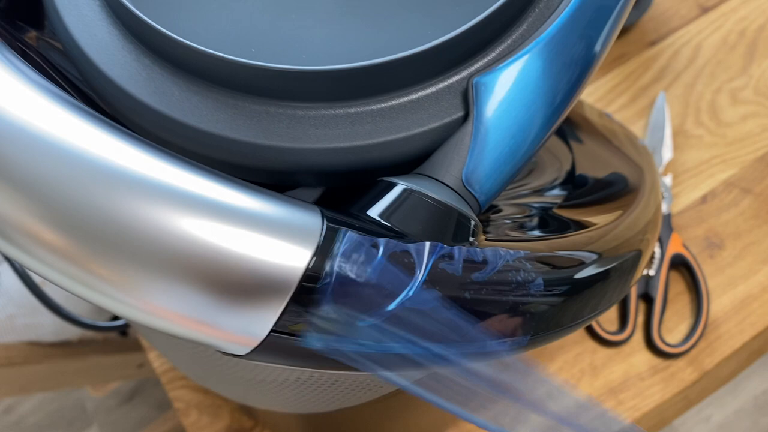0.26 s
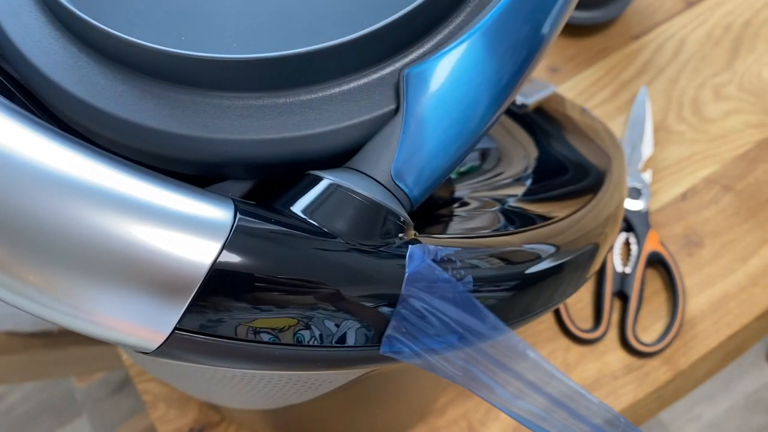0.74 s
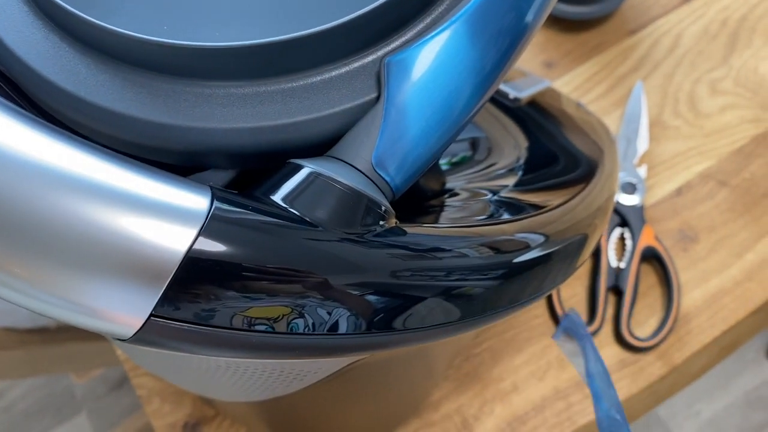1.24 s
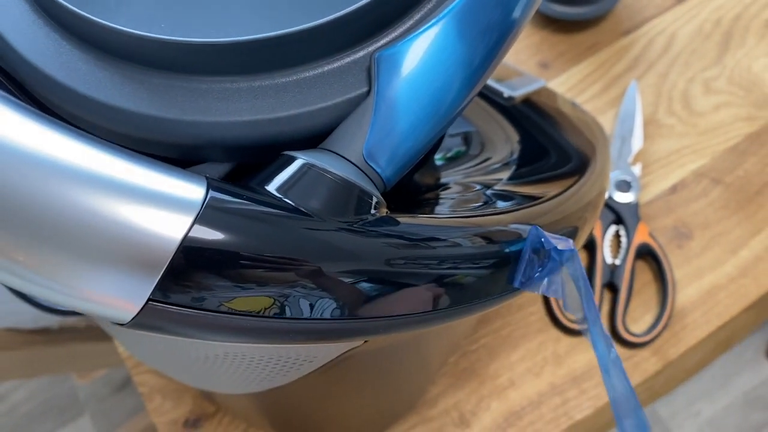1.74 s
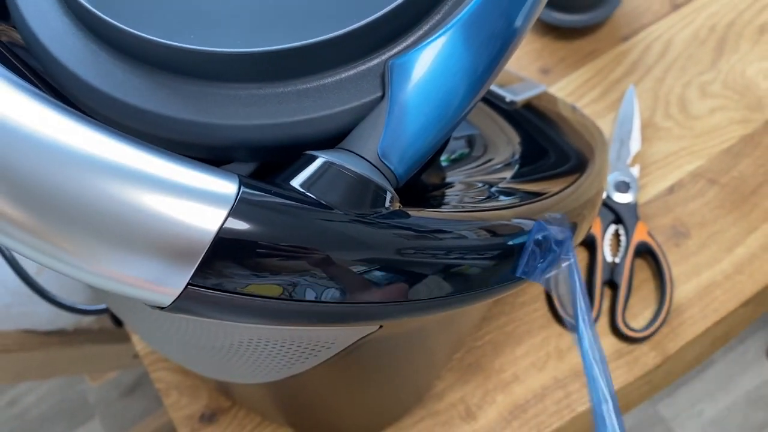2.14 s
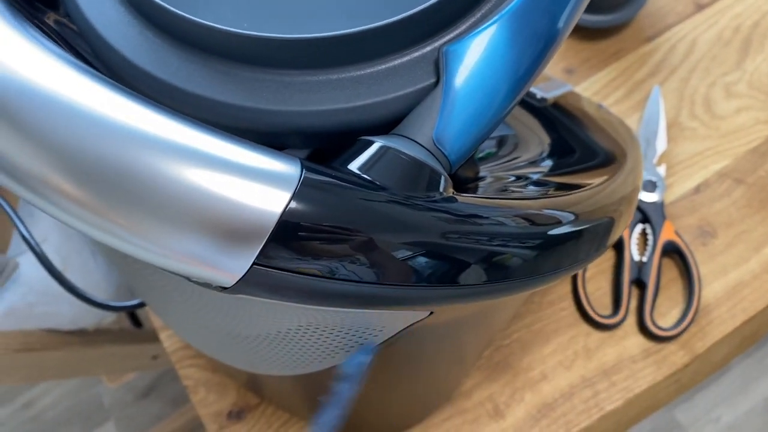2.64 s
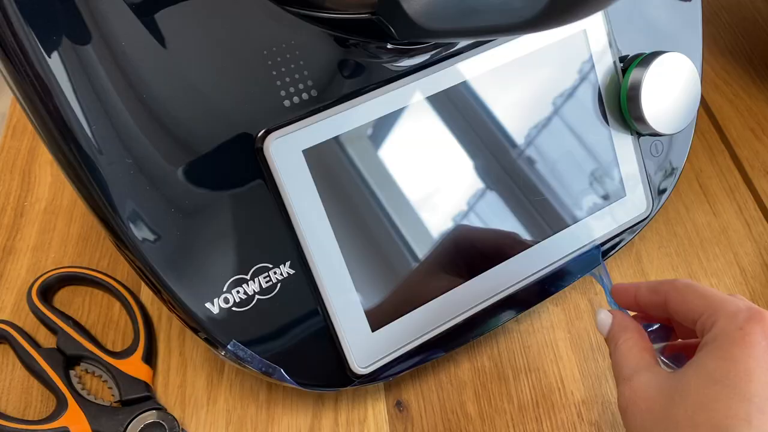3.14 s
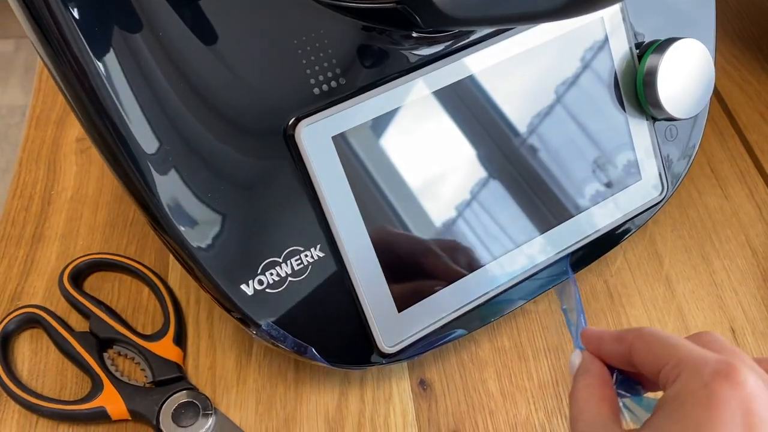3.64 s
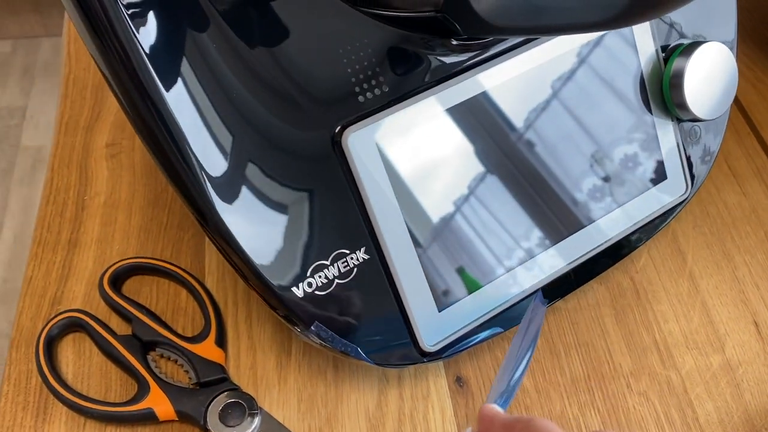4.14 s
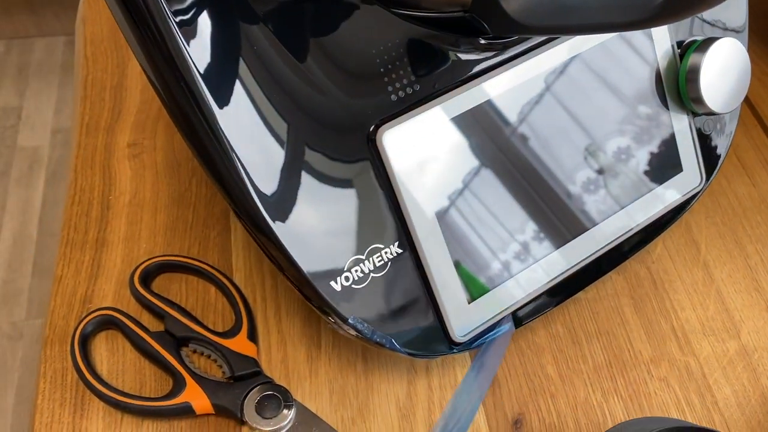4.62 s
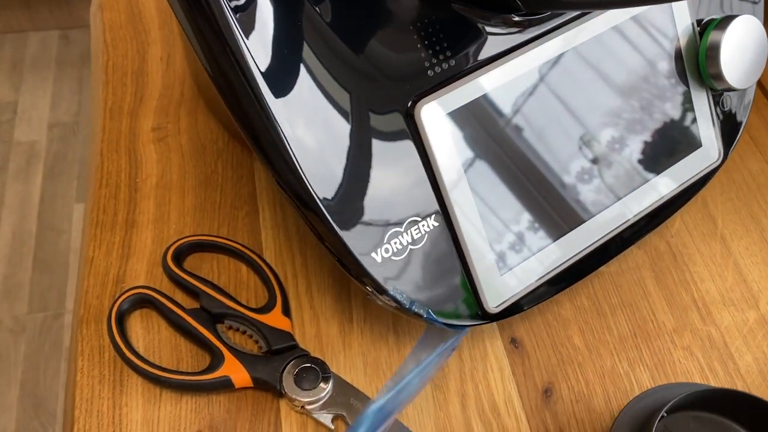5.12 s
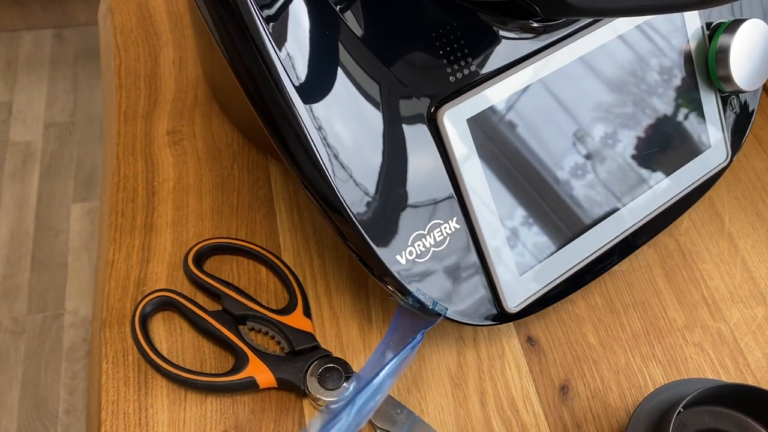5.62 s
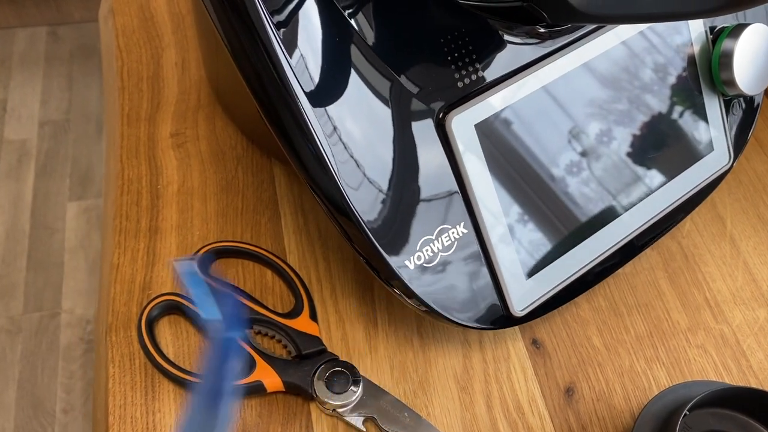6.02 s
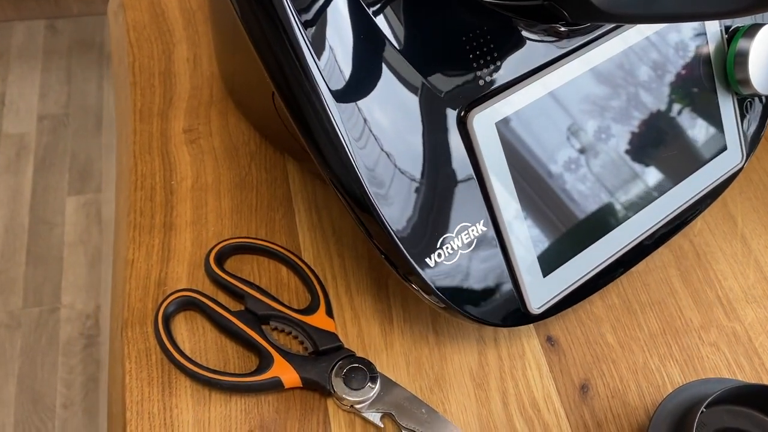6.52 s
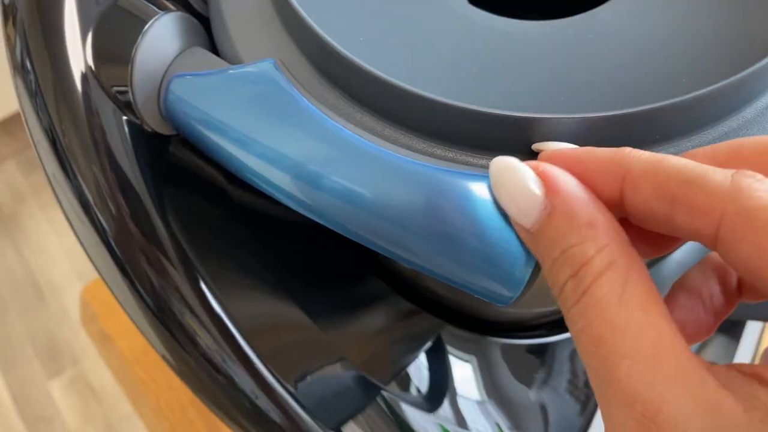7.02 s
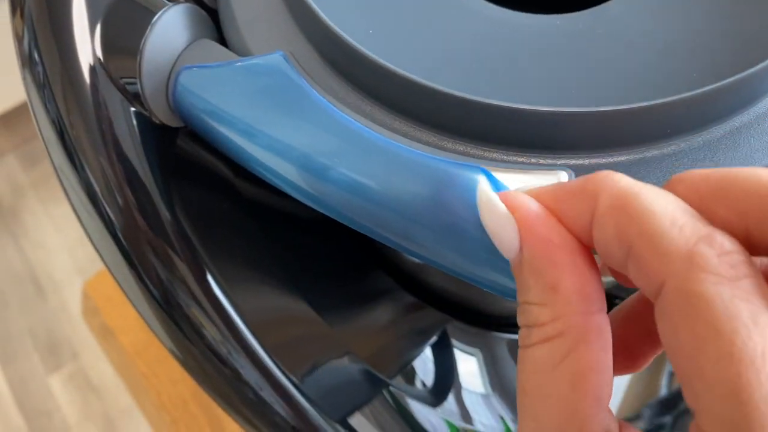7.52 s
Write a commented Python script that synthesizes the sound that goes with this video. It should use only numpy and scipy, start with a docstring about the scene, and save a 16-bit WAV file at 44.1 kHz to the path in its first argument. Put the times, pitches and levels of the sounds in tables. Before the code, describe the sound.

Very close in a small room, clingy protective film is pulled from a hollow kitchen appliance. Sharp bright snaps and crackle burst out, thin to scattered ticks, then return as a longer, denser rip with boomy knocks from the shell. It breaks into smaller bursts and ends abruptly, leaving faint room tone and barely audible fingertip rubbing. The close stereo treble shifts between sides.

```python
"""In a small room, thin protective film is peeled off the glossy shell of a kitchen appliance on a wooden
table. The glue lets go in sharp snaps and dense crackle: short noise bursts ring the taut film brightly, knock
the shell and push a boom out of the hollow inside. Jolts add dull thuds; faint room tone lies below. Two
peeling passages are followed by a barely audible one of fingertips rubbing. The scene changes where a passage
ends, cutting off the echoes, and two close microphone ports shift the treble against each other."""
import sys
import numpy as np
from scipy import signal
from scipy.fft import rfft, irfft, next_fast_len
from scipy.io import wavfile
from scipy.ndimage import uniform_filter1d

SR = 44100
rng = np.random.default_rng(int(sys.argv[2]) if len(sys.argv) > 2 else 0)


def master(y):
    """Save y as 16-bit WAV."""
    cut = np.clip(np.atleast_2d(y).T, -1, 1)
    pcm = np.round(cut * 32767)  # scale
    wavfile.write(sys.argv[1], SR, pcm.astype(np.int16))


N = 342216   # samples

PASSAGE_ENDS_S = 3.17, 6.915   # the scene changes here, at the ends of the two peeling passages

# resonances of the taut film: [f/Hz, width/Hz, level/dB]
FILM_MODES = [(6460, 10500, 0), (11200, 5650, 8), (15600, 1400, 6)]
# resonances of the hollow inside of the appliance: [f/Hz, width/Hz, level/dB]
HOLLOW_MODES = [(61, 33, -13), (95, 33, -5.5), (151.5, 30, -1), (223, 32, 2.5), (290, 67, -1.5),
                (417, 88, -1.5)]
# the free strip of film: [t/s, resonance f/Hz, pull on the hollow shell/dB, strength of its ring/dB]
FREE_STRIP = [(0, 7300, 0, -0.5), (1.2, 7600, 2, 3), (1.45, 5500, -12, -1.5), (2.0, 6930, -12.5, 4),
              (2.2, 6700, -1.5, 9.5), (2.45, 6770, -8.5, 4.5), (3.15, 5500, -14.5, 1.5),
              (3.25, 6800, -6, -8), (3.95, 6300, -0.5, 3.5), (4.15, 6100, -3, 12), (4.35, 5200, -3.5, 8.5),
              (4.7, 4770, -6.5, 4), (5.0, 6540, -6.5, -9.5), (5.95, 5300, -8, -1.5), (6.25, 4320, -10, 1.5),
              (6.75, 4600, -17, 4), (6.9, 4500, -4, 4)]


def from_db(db):
    """Gain of a dB value."""
    return 10 ** (np.asarray(db) / 20)


def rms_one(x):
    """Scale to unit rms."""
    return x / np.sqrt(np.mean(x ** 2) + 1e-20)


def resonance(x, hz, width):
    """Two-pole band-pass with gain 1 at its peak; a narrower width rings longer."""
    r = np.exp(-np.pi * width / SR)
    poles = [1, -2 * r * np.cos(2 * np.pi * hz / SR), r * r]
    return signal.lfilter([(1 - r * r) / 2, 0, (r * r - 1) / 2], poles, x + 1e-18)


def body(x, modes):
    """A vibrating object as parallel resonances with alternating signs."""
    out = 0
    for k, (hz, width, db) in enumerate(modes):
        out = out + (-1) ** k * from_db(db) * resonance(x, hz, width)
    return out


def drift(rate):
    """Slow random wander with spread 1 at its knots, rate knots per second."""
    knots = rng.standard_normal(int(N / SR * rate) + 3)
    return np.interp(np.arange(N) / SR * rate, np.arange(len(knots)), knots)


def room_tone():
    """Faint steady noise, shaped in frequency and mostly shared by both sides."""
    # colour of the room tone before its overall level is set: [f/Hz, relative level/dB]
    hush_colour = [(20, -15.5), (45, 0.5), (220, 2), (500, -11.5), (1000, -17.5), (15000, -36.5)]
    level_db = -74.5   # rms
    hz = np.maximum(np.fft.rfftfreq(N, 1 / SR), 1)
    colour_hz, colour_db = np.transpose(hush_colour)
    colour = from_db(np.interp(np.log(hz), np.log(colour_hz), colour_db))
    mid, side = irfft(rfft(rng.standard_normal((2, N))) * colour, N)
    return from_db(level_db) * rms_one(mid + .35 * side * [[1], [-1]])


def room(x):
    """Echo tail: noise dying band by band, partly shared by both sides; it is cut off where the scene changes
    at the end of a passage."""
    # decay of the room by band: [f/Hz, t60/s, left-right likeness 0..1]
    room_bands = [(146, 0.27, 1), (513, 0.49, 0.6), (1500, 0.41, .4), (4000, 0.41, 0.48), (8050, 0.25, 1),
                  (14100, 0.19, .85)]
    hz, t60, alike = np.transpose(room_bands)
    edges = np.r_[40, np.sqrt(hz[1:] * hz[:-1]), .45 * SR]
    t, tail = np.arange(SR // 2) / SR, 0
    for k in range(len(hz)):
        band = signal.butter(2, edges[k:k + 2], "band", fs=SR, output="sos")
        mid, side = signal.sosfilt(band, rng.standard_normal((2, len(t))))
        shared = np.clip(alike[k], 0, 1)
        stereo = np.sqrt(1 + shared) * mid + np.sqrt(1 - shared) * side * [[1], [-1]]
        tail = tail + from_db(-60 * t / t60[k]) * stereo
    tail = tail * (1 - np.exp(-t / 0.0017)) * (1 + 0.5 * np.exp(-t / 0.0061))   # table and shell echo first
    tail = tail / np.sqrt(np.sum(tail ** 2) / 2)
    out = np.zeros((2, N))
    cuts = [0, *[round(s * SR) for s in PASSAGE_ENDS_S], N]
    for a, b in zip(cuts, cuts[1:]):
        out[:, a:b] = signal.fftconvolve(x[None, a:b], tail, axes=1)[:, :b - a]
    return out


def thuds():
    """A jolt shakes the hollow inside and the table: noise through both bodies, dying away."""
    # jolts of the appliance: [t/s, nominal peak level/dB, t60/s]
    jolts = [(0.201, -43, 0.23), (2.156, -32, 0.5), (5.947, -31, 0.1), (6.185, -31, 0.082),
             (6.795, -32.5, 0.26), (6.867, -52, 0.79)]
    table_top = 94, 28, 3.7   # wood under the appliance: f/Hz, width/Hz, level/dB
    peak_to_rms_db = 10.5
    t, shake = np.arange(N) / SR, 0
    for s, peak_db, t60 in jolts:
        fade_db = -60 * np.maximum(t - s, 0) / t60
        shake = shake + (t > s) * from_db(peak_db - peak_to_rms_db + fade_db)
    return shake * rms_one(body(rng.standard_normal(N), [table_top, *HOLLOW_MODES]))


def knocked(x, pull_db):
    """The folds always ring; the shell rings only as hard as the strip pulls on it."""
    # folds of the film: [f/Hz, width/Hz, level/dB]
    crease_modes = [(1919, 736, 2), (2550, 946, 4), (3990, 3980, -8.5)]
    # the shell: [f/Hz, width/Hz, level/dB]
    shell_modes = [(500, 150, -5), (770, 580, 1), (1323, 320, 6)]
    return body(x, crease_modes) - from_db(0.6 * pull_db) * body(x, shell_modes)


def tugging():
    """The hand pulls in tugs: crackle level, shell share and small-snap level along time, all in dB."""
    # tugs: [start t/s, length/s, crackle level/dB, shell share/dB, typical small-snap peak/dB]
    tugs = [(0.0, 0.13, -50, -24, -64), (0.129, 0.099, -40.5, -22, -46), (0.2, 0.031, -31.5, -19.5, -29.5),
            (0.234, 0.069, -25.5, -6.5, -7.5), (0.324, 0.03, -28, -6, -16.5),
            (0.455, 0.055, -27.5, -7.5, -10.5), (0.509, 0.14, -43, -7.5, -21.5),
            (0.666, 0.084, -47.5, -5, -33.5), (1.061, 0.013, -43.5, -7, -21.5),
            (1.069, 0.018, -29, -9, -18.5), (1.096, 0.017, -29.5, -7, -17.5), (1.412, 0.076, -49, 2, -33.5),
            (1.49, 0.075, -44, 5.5, -27.5), (1.562, 0.045, -50, 2, -32.5), (1.702, 0.2, -50.5, 0, -45.5),
            (2.131, 0.023, -42.5, 2, -37.5), (2.155, 0.085, -29, -12.5, -18.5),
            (2.234, 0.034, -22, -18, -4.5), (2.267, 0.14, -41, -3, -24), (2.406, 0.18, -47, -1, -38.5),
            (2.651, 0.051, -40.5, -6.5, -39), (2.919, 0.043, -41.5, -8, -27),
            (2.993, 0.018, -44, 4.5, -26.5), (3.062, 0.096, -46, -5, -30),
            (3.346, 0.16, -40.5, -4.5, -32.5), (3.476, 0.24, -36.5, -4.5, -19.5),
            (3.771, 0.17, -42.5, -2.5, -30.5), (3.977, 0.43, -39.5, -5.5, -29.5),
            (4.53, 0.15, -30.5, -4.5, -14), (4.684, 0.12, -32, -13.5, -15.5),
            (4.819, 0.08, -46, -10.5, -26), (4.957, 0.077, -36, -9.5, -16),
            (5.028, 0.16, -33.5, -7.5, -18.5), (5.197, 0.046, -28.5, -11.5, -24.5),
            (5.256, 0.078, -40, -6, -28), (5.417, 0.13, -53, -1, -34.5), (5.577, 0.044, -41.5, 4.5, -21.5),
            (5.768, 0.034, -34, 0, -24), (5.823, 0.044, -33.5, -5.5, -21), (5.87, 0.071, -33, -4.5, -19),
            (6.12, 0.014, -43, -17, -32), (6.158, 0.051, -45.5, -2, -32), (6.228, 0.036, -38.5, -8.5, -49),
            (6.332, 0.057, -48, -12, -33), (6.41, 0.055, -42.5, -8, -34), (6.513, 0.084, -43.5, -6, -28),
            (6.619, 0.12, -43.5, -11.5, -35), (6.793, 0.12, -50.5, 2, -38.5),
            (7.081, 0.044, -90.5, 12, -80), (7.147, 0.028, -86.5, 12, -80), (7.254, 0.031, -84.5, 6, -80),
            (7.348, 0.1, -76, 1, -80), (7.45, 0.093, -81, -10, -80)]
    # between tugs the loose film never lies quite still: crackle, shell share, small-snap peak in dB
    rest_db = -57.5, -7, -56
    rows = np.tile(np.array(rest_db, float)[:, None], N)
    rows[0, round(PASSAGE_ENDS_S[-1] * SR):] = -110   # almost no crackle at rest in the last passage
    for s, length, *levels_db in tugs:
        rows[:, round(s * SR):round((s + length) * SR)] = np.array(levels_db)[:, None]
    return rows


def tear(clicks, fade_s):
    """Each slip is a short burst of noise that starts hard and fades."""
    envelope = signal.lfilter([1], [1, -np.exp(-1 / (fade_s * SR))], clicks + 1e-18)
    return envelope * rng.standard_normal(N)


def crackle(pull_db, film_db, share_db):
    """While the hand pulls, many small slips in clumps drive film and shell; the harder the pull, the denser."""
    swell_s = 0.012   # a tug takes hold and lets go within this time
    gains = from_db([film_db, film_db + share_db])
    film_gain, shell_gain = uniform_filter1d(gains, size=max(round(swell_s * SR), 1))
    per_s = 500 + 30000 * film_gain
    per_s[round(PASSAGE_ENDS_S[-1] * SR):] = 6000   # in the last passage fingertips only rub the film
    sizes = from_db(4.0 * np.minimum(rng.exponential(1, N), 4)) / np.sqrt(per_s)
    clumping = from_db(4.0 * drift(80))
    born = rng.random(N) < per_s * clumping / SR
    bursts = rms_one(tear(sizes * born, fade_s=0.0015))
    slips = rms_one(bursts + from_db(-20) * rng.standard_normal(N))   # a little steady hiss between slips
    film = film_gain * rms_one(body(slips, FILM_MODES))
    shell = shell_gain * rms_one(knocked(slips, pull_db))
    push = from_db(16) * shell_gain * slips
    return film, shell, push


def small_snaps(run_db):
    """Stick and slip: small snaps follow almost evenly, with their level set by the tug."""
    run_per_s, spread_db = 130, 4.5   # nominal rate, level scatter
    step, scatter = rng.standard_normal((2, 1500))
    run_s = np.cumsum(np.exp(0.3 * step)) / run_per_s
    run_s = np.where(run_s < PASSAGE_ENDS_S[-1], run_s, 0)   # none in the last passage
    small_db = np.where(run_s > 0, run_db[(run_s * SR).astype(int)] + spread_db * scatter, -200)
    return run_s, small_db


def snaps(share_db, run_db):
    """Every snap rings the film, strongest at the pitch of the free strip, and knocks the shell."""
    # glue letting go in the clearest snaps: [t/s, film peak level/dB]
    clear_snaps = [(0.0898, -29.5), (0.133, -28), (0.2005, -14), (0.2369, -10.5), (0.2536, -5.5),
                   (0.2774, -10), (0.2914, -6.5), (0.3311, -13.5), (0.4141, -18.5), (0.4325, -6),
                   (0.4639, -9.5), (0.4704, -12.5), (0.5207, -3.5), (0.599, -9.5), (0.7005, -27),
                   (0.7209, -2.5), (0.7547, -17.5), (0.7918, -4), (0.8836, -22.5), (0.895, -14.5),
                   (1.0657, -23.5), (1.076, -6.5), (1.0985, -5.5), (1.1038, -9), (1.296, -33), (1.368, -35),
                   (1.4957, -34), (1.5303, -23), (1.794, -32.5), (1.885, -22), (1.937, -29),
                   (2.0318, -22.5), (2.053, -18), (2.1643, -9.5), (2.1842, -7), (2.232, -10), (2.254, -9),
                   (2.387, -25), (2.517, -22.5), (2.5309, -21), (2.613, -23), (2.7026, -14.5), (2.802, -13),
                   (2.9404, -19.5), (3.0825, -20.5), (3.1427, -18.5), (3.2099, -16.5), (3.346, -20),
                   (3.425, -12.5), (3.4533, -10), (3.477, -8), (3.5076, -5), (3.5419, -11), (3.5711, -5),
                   (3.6162, -7), (3.6491, -11.5), (3.6641, -7), (3.707, -9), (3.7424, -9.5), (3.78, -10),
                   (3.8291, -7), (3.8688, -13), (3.8986, -9), (3.971, -20), (3.9862, -8), (4.0186, -4),
                   (4.0278, -9.5), (4.0398, -8), (4.0469, -6), (4.0708, -6), (4.0828, -7), (4.0902, -7),
                   (4.115, -11), (4.1322, -8), (4.152, -10), (4.1646, -4), (4.2004, -4), (4.2401, -4),
                   (4.2554, -4.5), (4.2625, -5.5), (4.2848, -6), (4.3136, -6.5), (4.3205, -5.5),
                   (4.351, -8.5), (4.4674, -13.5), (4.5294, -8.5), (4.5484, -12), (4.563, -6.5),
                   (4.6092, -8.5), (4.7009, -11.5), (4.832, -15), (4.8724, -13.5), (4.9644, -24.5),
                   (5.036, -12.5), (5.0989, -11), (5.1384, -11.5), (5.2084, -12.5), (5.4236, -19.5),
                   (5.478, -17.5), (5.5238, -23), (5.5783, -20), (5.668, -10.5), (5.7375, -7),
                   (5.7729, -11.5), (5.8337, -12.5), (5.8812, -17), (5.9332, -5.5), (6.125, -33),
                   (6.1534, -33), (6.1749, -23), (6.2294, -16.5), (6.267, -22), (6.3338, -24),
                   (6.4504, -18.5), (6.4926, -24), (6.572, -16.5), (6.6303, -23.5), (6.7059, -21)]
    # shell share of a snap: base, part of the tug's share, scatter
    base_db, follows, spread_db = -11, 0.76, 4.5
    size = 1024   # samples per snap
    film, shell, push = np.zeros((3, N))
    t = np.arange(size) / SR
    crack = (1 - np.exp(-t / .0002)) * (np.exp(-t / .00055) + .12 * np.exp(-t / .003))
    s, peak_db = np.c_[np.transpose(clear_snaps), small_snaps(run_db)]
    at = (s * SR).astype(int)
    noise = rng.standard_normal((len(s), size))
    direction, scatter = rng.standard_normal((2, len(s)))
    shell_db = base_db + follows * share_db[at] + spread_db * scatter
    strip_s, *columns = np.transpose(FREE_STRIP)
    hz, pull_db, ring_db = [np.interp(s, strip_s, column) for column in columns]
    for k in np.flatnonzero(peak_db > -70):   # the faintest are left out
        burst, span = crack * noise[k], slice(at[k], at[k] + size)
        bright = body(burst, FILM_MODES) + from_db(ring_db[k]) * resonance(burst, hz[k], 1300)
        knock = knocked(burst, pull_db[k])
        film[span] += from_db(peak_db[k]) * bright / np.abs(bright).max()
        shell[span] += from_db(peak_db[k] + shell_db[k]) * knock / np.abs(knock).max()
        push_db = peak_db[k] + shell_db[k] / 2 - 1.5
        push[span] += from_db(push_db) * crack * np.sign(direction[k])   # a tug in or out
    return film, shell, push


def scene():
    """Film, shell and hollow are driven by snaps and crackle; thuds, room and room tone join them."""
    strip_s, _, strip_pull_db, _ = np.transpose(FREE_STRIP)
    pull_db = np.interp(np.arange(N) / SR, strip_s, strip_pull_db)
    film_db, share_db, run_db = tugging()
    film, shell, push = np.add(snaps(share_db, run_db), crackle(pull_db, film_db, share_db))
    boom = body(from_db(pull_db) * push, HOLLOW_MODES) + thuds()
    # the sound leaves from changing spots along the strip and over the shell
    side = 0.34 * drift(90) * film + 0.5 * drift(70) * shell + .25 * drift(60) * boom
    peel = film + shell + boom
    return peel + side * [[1], [-1]] + from_db(-9) * room(peel) + room_tone()


def record(dry):
    """Two microphone ports differ in phase and balance; loud peaks are rounded and the top is cut."""
    # phase between the ports: [f/Hz, lead of the left port/rad]
    port_lead = [(0, 0), (430, .4), (4310, .1), (7410, 0), (8350, -2.5), (9560, -3.6), (10700, -6.0),
                 (11600, -6.7), (12900, -9.3), (13800, -9.7), (14600, -11.9), (15500, -12.7),
                 (16700, -12.6)]
    # balance between the ports: [f/Hz, left minus right level/dB]
    port_balance = [(100, 0.9), (1500, 2.0), (4500, 0)]
    cutoff_hz = 17100
    size = next_fast_len(N + 4096)
    hz = np.fft.rfftfreq(size, 1 / SR)
    lead = np.interp(hz, *np.transpose(port_lead))
    balance_hz, balance_db = np.transpose(port_balance)
    lean_db = np.interp(np.log(hz + 1), np.log(balance_hz), balance_db)
    left = np.exp(.5j * lead) * from_db(lean_db / 2)
    ported = irfft(rfft(dry, size) * [left, 1 / left], size)[:, :N]
    rounded = .9 * np.tanh(ported / .9)
    return signal.sosfilt(signal.cheby2(12, 70, cutoff_hz, fs=SR, output="sos"), rounded)


dry = scene()
out = record(dry)
master(out)
```